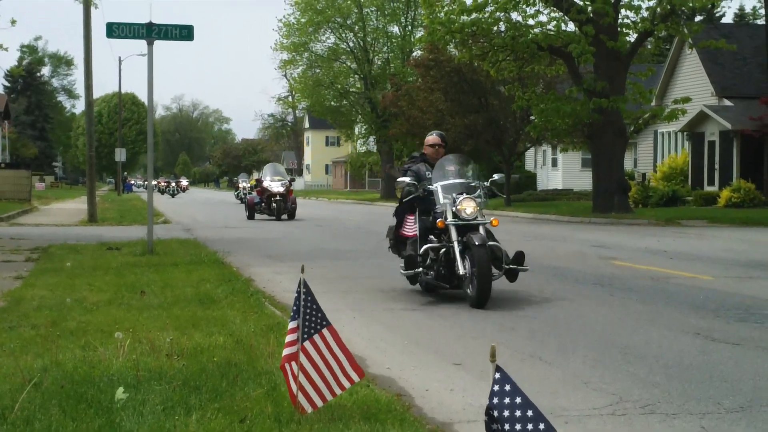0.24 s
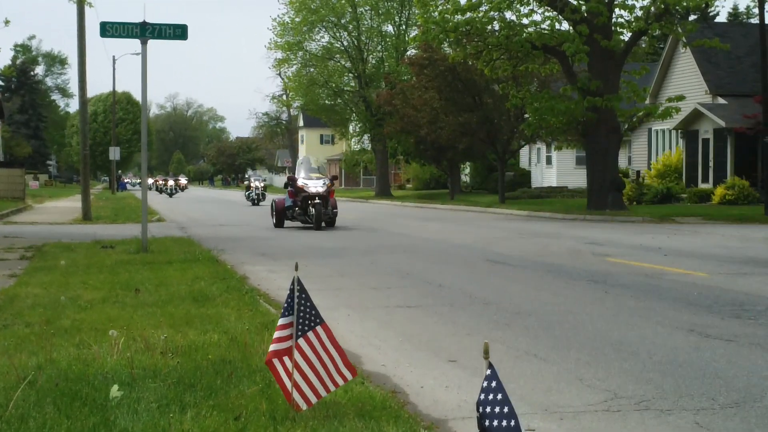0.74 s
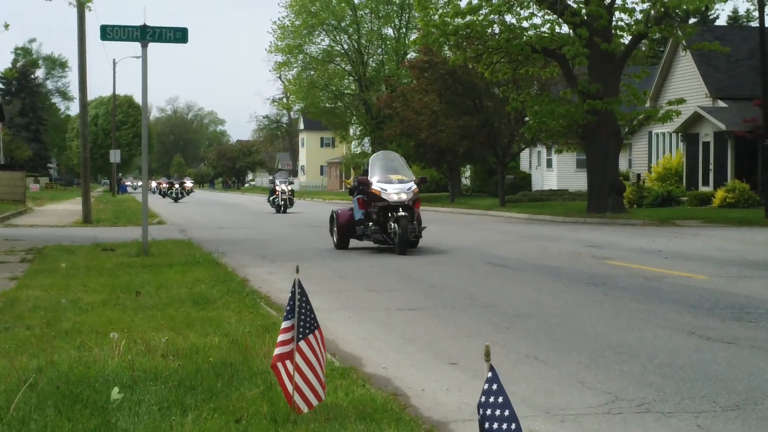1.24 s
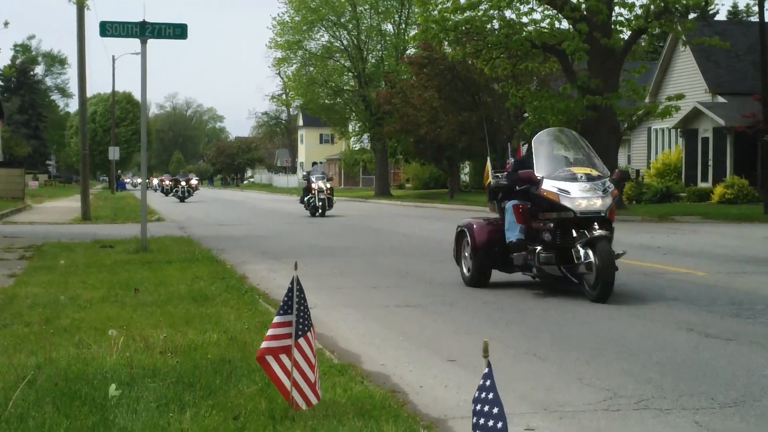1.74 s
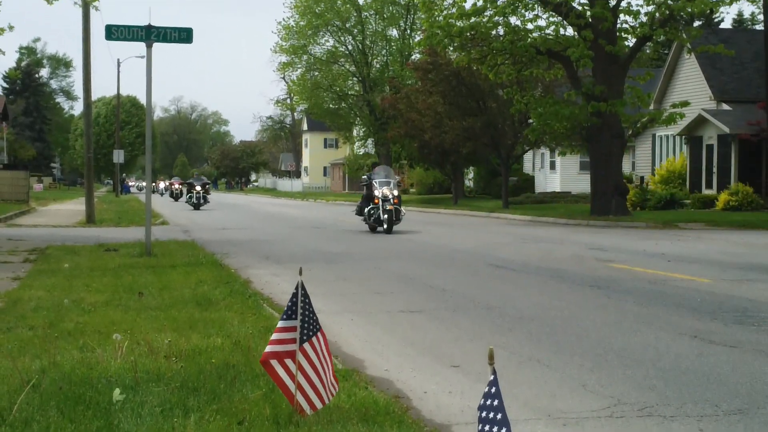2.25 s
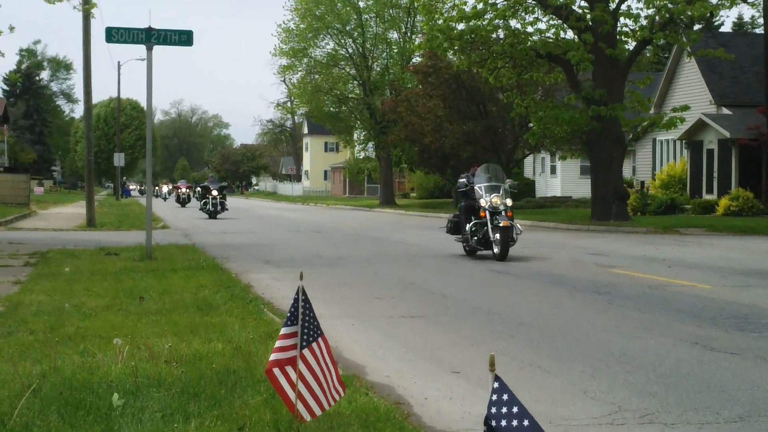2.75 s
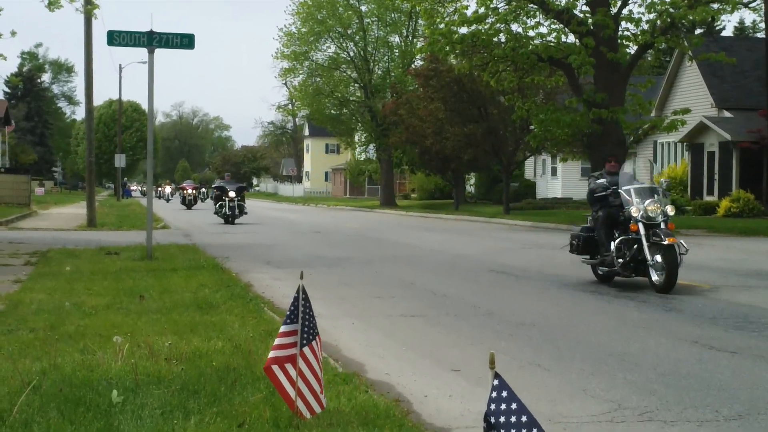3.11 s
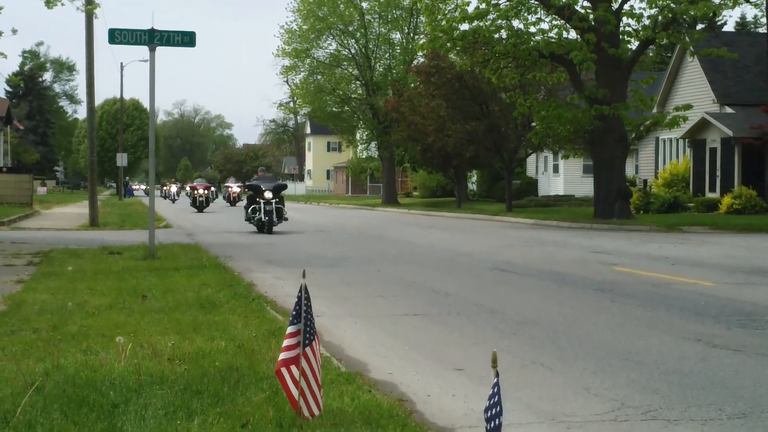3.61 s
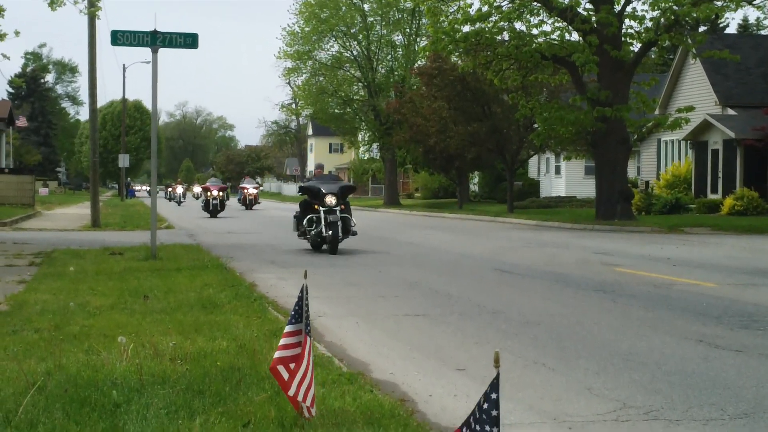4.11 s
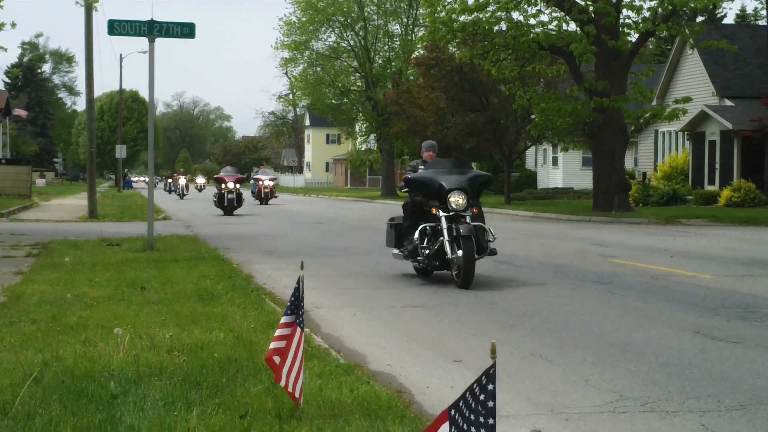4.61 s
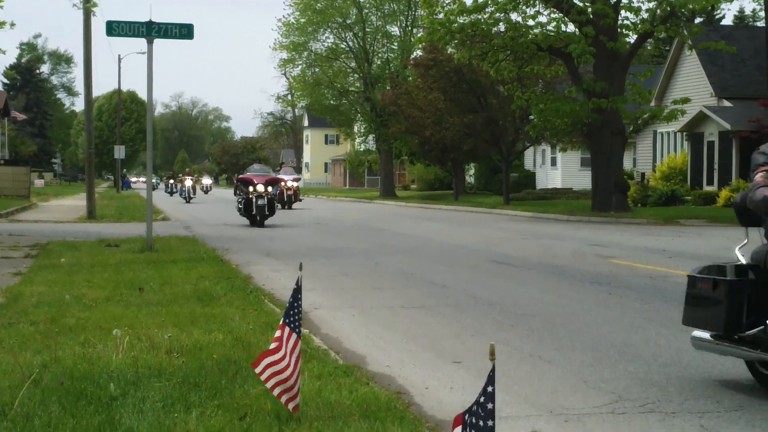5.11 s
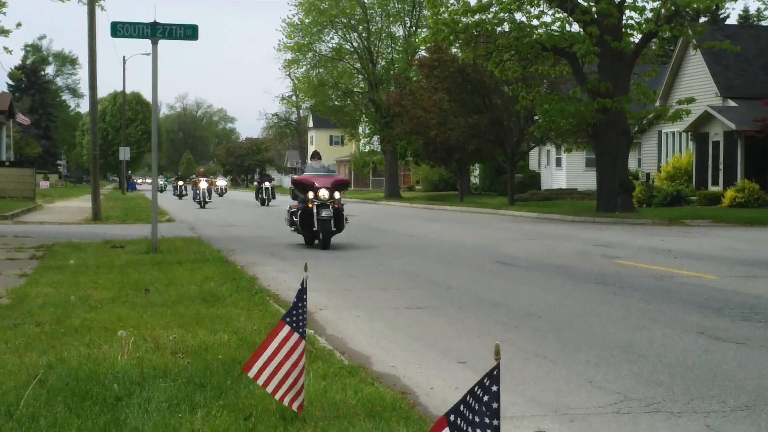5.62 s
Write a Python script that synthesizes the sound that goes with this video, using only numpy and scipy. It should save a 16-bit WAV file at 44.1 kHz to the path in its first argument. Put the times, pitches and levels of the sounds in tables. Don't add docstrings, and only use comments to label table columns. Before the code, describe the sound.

A spaced-out string of heavy low-pitched motorcycles passes close by, engines throbbing and popping, tyres hissing, while gusts buffet the microphone from mid-way.

```python
import sys
import numpy as np
from scipy import signal
from scipy.fft import rfft, irfft
from scipy.io import wavfile

SR = 44100
rng = np.random.default_rng(int(sys.argv[2]) if len(sys.argv) > 2 else 0)


def inscribe(sig):
    pcm = np.round(np.clip(np.atleast_2d(sig).T, -1, 1) * 32767)
    wavfile.write(sys.argv[1], SR, pcm.astype(np.int16))


def boost_factor(decibels):
    exponent = np.asarray(decibels, float) / 20
    return 10 ** exponent


N = 258190

# level_db of each multiple of the engine cycle, from the third up
LEAVING_NOTE = [-16.0, -2.0, 0.0, -7.0, -10.0, -20.0, -12.0, -16.0, -11.0, -13.0, -11.0, -15.0, -15.0,
                -11.0, -12.0, -10.0, -25.0, -22.0, -22.0, -27.0, -26.0, -27.0, -35.0, -25.0, -30.0, -30.0]
CRUISER_NOTE = [-15.0, -18.0, -6.0, -6.0, -7.0, -16.0, -9.0, -10.0, -16.0, -2.0, -4.0, -17.0, -12.0, -6.0,
                -5.0, -5.0, -10.0, -20.0, -20.0, -20.0, -20.0, -27.0, -26.0, -15.0, -22.0, -19.0, -22.0,
                -28.0, -25.0, -22.0, -24.0, -21.0, -22.0, -20.0, -23.0, -21.0, -21.0, -24.0]
TRIKE_NOTE = [-20.0, -20.0, -20.0, -30.0, -16.0, -20.0, -14.0, -21.0, -20.0, -18.0, -25.0, -31.0, -12.0,
              -36.0, -29.0, -22.0, -19.0, -23.0, -14.5, -25.0, -17.5, -26.0, -28.0, -30.0, -26.0, -29.0,
              -36.0, -32.0, -30.0, -32.0, -33.0, -30.0, -33.0]
FAR_LANE_NOTE = [-7.0, -9.0, 0.0, -3.0, -11.0, -13.0, -9.0, -11.0, -14.0, -13.0, -23.0, -13.0, -18.0, -23.0,
                 -17.0, -18.0, -20.0, -24.0, -28.0, -34.0, -36.0, -26.0, -31.0, -29.0, -32.0, -36.0, -28.0]
TOURER_NOTE = [-8.0, -7.0, -2.5, -10.0, -16.0, -8.0, -20.0, -13.0, -12.0, -14.0, -24.0, -24.0, -16.0, -16.0,
               -26.0, -20.0, -27.0, -22.0, -25.0, -28.0, -24.0, -34.0, -37.0, -38.0, -33.0, -32.0]
# half_fallen_s (pitch), fall_s, coming_cycles_per_s, going_cycles_per_s, one_firing_s
PASSES = [
    (.51, .38, 21.2, 19.6, .1),
    (1.01, .2, 14.55, 13.205, 1.4397),
    (2.57, .25, 19.27, 17.81, 2.1),
    (3.872, .42, 21.22, 18.426, 4.4125),
    (5.54, .36, 21.15, 19.1, 5.3),
]
# from_s, to_s
EARSHOT = [
    (0, 1.35),
    (0, 1.95),
    (1.1, 3.2),
    (3.4, 5.2),
    (4.6, 5.86),
]
# loudest_s, level_db, approach_s, retreat_s, left_minus_right_db once past
EXHAUSTS = [
    (.3, -44, 0.88, 0.17, -24),
    (.9, -40.5, 0.17, 0.072, -11.5),
    (2.5, -47, 0.44, 0.11, -18.5),
    (4.0, -37.5, 0.17, 0.18, -11),
    (5.42, -38, 0.23, 0.11, -23),
]
# time_s, peak_db, centre_hz, sizzle_db
CRUISER_CRACKS = [(1.162, -65, 8100, -63), (1.236, -60, 4770, -56), (1.31, -63.0, 5600, -75),
                  (1.44, -56, 5460, -83.0), (1.516, -57, 6700, -82), (1.623, -66, 5600, -84.0),
                  (1.667, -58, 8200, -68), (1.698, -60, 6600, -82.0), (1.819, -96, 5000, -81),
                  (1.85, -59, 7700, -85), (1.895, -62, 4760, -61), (1.927, -60, 6100, -77.0),
                  (1.972, -69, 5300, -77.0), (2.079, -65.0, 7500, -81), (2.123, -70, 5000, -68.0),
                  (2.142, -56, 6370, -61), (2.609, -57, 7250, -83.0), (2.653, -54, 6600, -63),
                  (2.683, -59, 5900, -58), (2.712, -56, 7200, -79), (2.728, -62, 6700, -60),
                  (2.76, -55, 8000, -62.0), (2.804, -57, 7940, -53), (2.815, -69.0, 7740, -65),
                  (2.835, -46.5, 8260, -65), (2.879, -55, 7800, -53), (2.91, -57, 6200, -69),
                  (2.954, -58, 5500, -70), (3.003, -58, 5170, -64), (3.105, -67, 6300, -61),
                  (3.18, -67, 5100, -60), (3.286, -58, 7300, -77.0), (3.33, -56, 7770, -55),
                  (3.35, -53, 4370, -68.0), (3.405, -63, 4600, -58)]
FAR_LANE_CRACKS = [(3.691, -57, 2870, -66.0), (3.821, -60.0, 5000, -61.0), (3.877, -54, 6100, -44),
                   (3.94, -42.5, 4000, -46), (3.963, -45, 3400, -55), (3.991, -44, 4800, -57.0),
                   (4.043, -49, 4300, -42), (4.095, -51, 3740, -43), (4.17, -48, 3040, -40),
                   (4.181, -55, 3370, -43), (4.224, -45, 3080, -42), (4.239, -60, 5700, -44),
                   (4.254, -64.0, 4700, -56), (4.276, -45.5, 3320, -46), (4.292, -61.0, 3700, -43),
                   (4.33, -63.0, 3800, -49), (4.344, -63.0, 4600, -52), (4.36, -51, 4100, -50),
                   (4.383, -48.5, 3800, -51), (4.414, -51, 5500, -46), (4.436, -47, 4040, -58),
                   (4.467, -47.5, 4300, -45), (4.49, -53, 3870, -61), (4.521, -53, 5330, -49),
                   (4.543, -61.0, 4000, -60), (4.56, -60, 5630, -62), (4.576, -56, 5300, -53),
                   (4.597, -63.0, 4900, -59), (4.628, -48, 5160, -51), (4.65, -52, 4600, -63),
                   (4.683, -60, 5600, -68.0), (4.736, -54, 6230, -59), (4.759, -50, 6500, -56),
                   (4.844, -55.0, 4600, -62), (5.116, -62, 6500, -62), (5.198, -59, 4750, -54),
                   (5.222, -57, 6500, -60), (5.276, -54, 4600, -60), (5.336, -57, 5000, -58)]
# time_s, peak_db, centre_hz, sizzle_db
KNOCKS = [(0.575, -48, 738, -80), (0.643, -46, 525, -80), (0.712, -43, 522, -82), (3.244, -49, 751, -101),
          (3.689, -45, 500, -87), (3.787, -62, 501, -80), (3.887, -50, 501, -80), (3.937, -49, 503, -80),
          (3.989, -54, 720, -80), (4.064, -51, 507, -80), (4.093, -45.5, 700, -84), (4.198, -58, 720, -80),
          (4.412, -47, 540, -84), (4.465, -52, 501, -78), (4.519, -50, 550, -82), (4.681, -68, 643, -80)]
# time_s, level_db
FIRING_TONE = [(1.2, -74), (1.45, -50.5), (1.7, -51), (1.95, -47), (2.3, -42.5), (2.55, -42.5), (2.76, -48),
               (2.84, -65), (3.2, -59)]
# time_s, level_db
GEAR_MESH = [(1.65, -85), (1.8, -72), (2.1, -69.5), (2.4, -61), (2.47, -61), (2.55, -88)]
# nearest_s, low_db, middle_db, top_db, retreat_s
ROAD = [
    (3.4, -72, -83, -82, 0.023),
    (.4, -64, -70, -80.5, 0.48),
    (.92, -63.5, -72, -74, 0.19),
    (2.27, -64.5, -77.5, -85, 0.78),
    (3.83, -67, -72.5, -80, 0.74),
    (5.4, -63, -67, -73, 0.3),
]
# approach_s, late_s (of the peak), steepness (with distance), far_column_db
HISS_RANGES = [
    (0.2, 0.0026, 1.53, -72),
    (0.43, 0.029, 1.51, -91.5),
    (0.47, 0.021, 2.4, -95),
]
# late_s (after nearest), lasting (share of retreat),
# inverted (share)
REAR_LOBE = [
    (.1, 0.91, 0.31),
    (.12, 0.54, 0.46),
    (.4, 0.69, 0.48),
]
# pitch_hz, level_db (per Hz)
ROAD_COLOUR = [(260, -8), (450, 5.5), (570, 3.5), (662, 4.5), (745, 6), (944, 2), (1100, 3.5), (2590, -5),
               (9830, -9.5), (15600, -21.5)]
# pitch_hz, level_db (per Hz)
ROAR_COLOUR = [(29, -20), (50, -10), (92, -1), (122, -0.5), (194, -18.5), (238, -9), (338, -20),
               (555, -29.5), (900, -42.5), (1170, -79), (1980, -120)]
# pitch_hz, likeness (0 to 1)
LIKENESS = [(100, .1), (400, .3), (1500, .65), (5000, .7), (7200, .85), (9200, .88), (12000, .7),
            (15500, .65)]
# pitch_hz, lead_radians
PORT_PHASE = [(0, 0), (3010, 0.1), (6290, 0.1), (8180, -0.1), (9130, -0.2), (12500, -1.7), (13400, -1.6),
              (15200, -2.7)]
# start_s, end_s, pitch_hz, width_hz, level_db
WHINES = [(1.15, 1.5, 1250, 70, -76), (1.75, 2.45, 1240, 130, -68), (1.5, 2.65, 1700, 1100, -69.5),
          (-.4, .45, 1150, 160, -70), (-.4, .3, 2000, 1400, -70), (3.9, 4.45, 9700, 2800, -72.5),
          (4.25, 4.95, 12300, 2600, -80), (4.15, 4.65, 3700, 1400, -73), (5.1, 5.6, 2000, 1000, -70),
          (4.94, 5.07, 7880, 90, -78), (4.95, 5.05, 8170, 90, -81), (5.33, 5.4, 7700, 60, -78)]
# pass_index, from_s, to_s, level_db
REAR_TICKS = [
    (1, 1.6, 2.2, -54),
    (1, 2.55, 3.95, -49),
    (3, 4.4, 5.45, -47),
]
# time_s, thump_db, left_minus_right_db, flutter_minus_thump_db
GUSTS = [(0, -60, 14, -11), (.6, -71, 13, 4), (1.05, -47.5, -9, -2.5), (1.3, -66, 3.5, 11),
         (1.5, -71, 3, -8), (1.85, -77, 11, 4), (2.2, -51, -4, -12), (2.5, -49, 8, -27),
         (2.8, -50.5, 8.5, -9.5), (3.1, -48.5, -1.5, -0.5), (3.35, -33, -3.5, -12.5), (3.6, -38, 2.5, -1.5),
         (3.9, -28.5, -2, -9), (4.25, -29.5, 4, -6.5), (4.5, -35, -1, -9), (5.0, -33.5, 0, -23),
         (5.45, -45.5, 4, -2.5), (5.85, -45, 5.5, -8.5)]
# pitch_hz, level_db (per Hz)
GUST_COLOUR = [(2.9, -23), (5.0, 5.5), (17, -1.5), (69, -17), (102, -16), (272, -29), (534, -47),
               (693, -55), (900, -67), (1170, -102), (1980, -120)]
# start_s, end_s, pitch_hz, level_db, port (0 left, 1 right)
HUMS = [(3.27, 3.45, 165, -38, 1), (3.14, 3.3, 82, -53, 0), (3.48, 3.62, 175, -44, 0),
        (4.2, 4.35, 135, -36, 0)]
# time_s, width_s
LULLS = [(3.48, .012), (3.975, .008), (4.235, .01), (4.452, .014), (4.535, .01), (4.79, .014), (4.857, .01)]
# time_s, peak_db, width_ms, port (0 left, 1 right), push (1, pull -1)
SLAPS = [(3.225, -27, 6.4, 0, -1), (3.555, -22, 2.9, 0, 1), (3.603, -29.5, 4.4, 1, -1),
         (3.603, -27, 4.9, 0, 1), (3.637, -27, 1.85, 1, 1), (3.66, -24, 2.4, 0, -1),
         (3.669, -18.5, 10.2, 1, 1), (3.723, -21, 4.1, 0, -1), (3.733, -21, 7, 1, -1),
         (3.785, -30, 6.1, 0, -1), (3.887, -21, 6.0, 1, 1), (3.918, -27, 3.4, 0, -1),
         (3.918, -14.5, 4.3, 1, 1), (3.966, -26, 3.2, 1, 1), (4.029, -31, 2.7, 1, 1),
         (4.098, -19, 4.2, 1, -1), (4.099, -24, 3.3, 0, 1), (4.141, -22, 3.5, 0, 1),
         (4.158, -22, 7.4, 1, 1), (4.202, -13.5, 4.3, 1, -1), (4.254, -21.5, 5.2, 1, -1),
         (4.263, -27, 2.6, 0, 1), (4.299, -31, 3.9, 0, 1), (4.433, -19.5, 5.7, 1, 1),
         (4.477, -25, 3.6, 0, 1), (4.504, -26, 3, 0, 1), (4.523, -31, 4.8, 1, -1), (4.558, -23, 3.3, 1, -1),
         (4.679, -21.5, 7, 1, 1), (4.837, -26.5, 8, 1, -1), (4.874, -18, 2.9, 1, 1),
         (4.884, -24, 3.1, 0, 1), (5.077, -24.5, 4.3, 1, 1), (5.3, -23, 5.9, 1, -1),
         (5.333, -23, 5.9, 0, 1), (5.577, -22.5, 3, 1, 1), (5.581, -23, 5.3, 0, -1),
         (5.606, -22, 1.7, 1, -1), (5.665, -20.5, 6.7, 1, -1), (5.708, -30, 4.4, 1, -1)]

COMING_PAN_DB = -2
PUFF_RISE_S = .0006
SWEEP_CYCLES, SWEEP_LATE_CYCLES = .07, .25
SWEEP_SCATTER = .35
SHOCK = 1.7
HISS_PAN_DB, SWING_DB, SWING_LATE_S, SWING_S = -2.5, -6.5, 0.12, 0.2
SHEEN_NEAR_HZ, SHEEN_FAR_HZ = 10400, 13100
SHEEN_WIDTH, SHEEN = 1.207, 0.9
LOBE_EDGE_S, LOBE_LEAST_S, LOBE_TOP_HZ = 0.065, 0.23, 11000
BOUNCE_FAR_MS, BOUNCE_NEAR_MS = 0.18, 0.25
BOUNCE_LATE_S, BOUNCE_S = 0.17, 0.16
REAR_TICK_HZ, REAR_TICK_TOP_HZ, REAR_TICK_DB = 7800, 10600, -5
LULL_DEPTH = .85


def engine(half_s, fall_s, coming, going, fire_s):
    passed = (1 + np.tanh((np.arange(N) / SR - half_s) / fall_s)) / 2
    turns = np.cumsum(coming + (going - coming) * passed) / SR
    return passed, turns - turns[round(fire_s * SR)]


def firings(turns, twin_gap, second_db, spread_db):
    first = np.diff(np.floor(turns), prepend=0) > 0
    second = np.diff(np.floor(turns - twin_gap), prepend=0) > 0
    strength = boost_factor(spread_db * np.clip(rng.standard_normal(N), -2, 2))
    return (first + boost_factor(second_db) * second) * strength


def exhaust_tones(note, passed, turns, span, wander_db, dulling, hollow_db, scatter):
    tones = np.zeros((2, N))
    far_db = -dulling * (1 - np.clip(3 * passed, 0, 1))[span]
    thin_db = hollow_db * passed[span] ** 8
    for multiple, db in enumerate(note, start=3):
        beat, sway = drift(2.)[:, span], drift(1.)[:, span]
        sweep = np.pi * multiple * (2 * SWEEP_LATE_CYCLES + SWEEP_CYCLES * multiple)
        start = np.array([[0], [1.3]]) + SWEEP_SCATTER * rng.standard_normal((2, 1))
        start = start + scatter * rng.standard_normal() - sweep
        level_db = db + wander_db * beat + far_db * multiple / 20 + (multiple < 7) * thin_db
        tones[:, span] += boost_factor(level_db) * np.sin(2 * np.pi * multiple * turns[span] + start + .35 * sway)
    return tones / np.sqrt(np.sum(boost_factor(np.array(note[2:])) ** 2) / 2)


def bike(index, note, wander_db, roar_db, pop_db, pop_hz, rasp_db, rear_db, dulling, hollow_db,
         twin_gap=.41, scatter=0):
    start_s, end_s = EARSHOT[index]
    passed, turns = engine(*PASSES[index])
    loudest_s, peak_db, approach_s, retreat_s, past_pan_db = EXHAUSTS[index]
    span = slice(round(start_s * SR), min(N, round(end_s * SR)))
    tones = exhaust_tones(note, passed, turns, span, wander_db, dulling, hollow_db, scatter)
    rear = boost_factor(rear_db * passed ** 2)

    clicks = firings(turns, twin_gap, -3.5, 1.2)
    puff = signal.lfilter([1], [1, -np.exp(-1 / (.004 * SR))], clicks)
    puff = signal.sosfilt(signal.butter(2, 1 / (2 * np.pi * PUFF_RISE_S), fs=SR, output="sos"), puff)
    roar = boost_factor(roar_db) * (0.44 + puff) * coloured(ROAR_COLOUR)

    r, w = np.exp(-np.pi * 250 / SR), 2 * np.pi * pop_hz / SR
    ring = signal.lfilter([0, np.sin(w)], [1, -2 * r * np.cos(w), r * r], clicks)
    pop = boost_factor(pop_db) * rear * ring

    snap = signal.lfilter([1], [1, -np.exp(-1 / (.0015 * SR))], clicks * boost_factor(2 * drift(40, count=1)))
    rasp = boost_factor(rasp_db) * rear * snap * rms_one(band(coloured(ROAD_COLOUR), 3000, 20000))

    t = np.arange(N) / SR
    fade_in = np.clip((t - start_s) / 0.38 + (start_s == 0), 0, 1)
    fade_out = np.clip((end_s - t) / 0.21 + (end_s > N / SR), 0, 1)
    pan_db = (COMING_PAN_DB + past_pan_db * passed) * np.array([[.5], [-.5]])
    level = boost_factor(peak_db + pan_db) * np.sqrt(swell(loudest_s, approach_s, retreat_s))
    turned = np.array([np.tanh(4 - 8 * passed), np.ones(N)])
    return fade_in * fade_out * level * (tones + (roar + pop + rasp) * turned)


def drone(curve, order, pan_swing_db):
    (level_db,) = in_time(curve)
    t = np.arange(N) / SR
    passed, turns = engine(*PASSES[2])
    heard = np.clip((t - curve[0][0]) * 10, 0, 1) * np.clip((curve[-1][0] - t) * 10, 0, 1)
    phase = 2 * np.pi * order * turns + np.array([[0], [1.3]])
    pan_db = (COMING_PAN_DB + pan_swing_db * passed) * np.array([[.5], [-.5]])
    return heard * boost_factor(level_db + 3.0 + 1.8 * drift(9.9) + pan_db) * np.sin(phase)


def cracks(events, decay_s, width, sizzle_hz, sizzle_db, left, gain_db):
    out, age = np.zeros((2, N)), np.arange(300) / SR
    for s, db, hz, top_db in events:
        common, *own = rng.standard_normal((3, 300))
        common[:3] = SHOCK
        burst = (common + .3 * np.array(own)) * np.exp(-age / decay_s)
        body = band(band(burst, hz / width, hz * width), hz / width, hz * width)
        sizzle = band(band(burst, sizzle_hz, 12500), sizzle_hz, 13500)
        sizzle = sizzle * [[-1], [1]]
        at = round(s * SR)
        out[:, at:at + 300] += boost_factor(db + gain_db) * body / np.abs(body).max()
        out[:, at:at + 300] += boost_factor(top_db + sizzle_db) * sizzle / np.abs(sizzle).max()
    return out * [[left], [1]]


def road():
    pan_db = HISS_PAN_DB + SWING_DB * nearness(SWING_LATE_S, SWING_S)
    hiss, shared = coloured(ROAD_COLOUR), drift(40.0, count=1)
    low, below_top = [signal.sosfiltfilt(signal.butter(2, hz, fs=SR, output="sos"), hiss)
                      for hz in (2500, 7000)]
    top, near = hiss - below_top, nearness(BOUNCE_LATE_S, BOUNCE_S)
    for hz, share in ((SHEEN_NEAR_HZ, near), (SHEEN_FAR_HZ, 1 - near)):
        top = top + SHEEN * share * band(top, hz / SHEEN_WIDTH, hz * SHEEN_WIDTH)
    ranges = [(low, 1.1), (below_top - low, .9), (top, .5)]
    out = 0
    for k, (part, swing) in enumerate(ranges):
        approach_s, late_s, steep, far_db = HISS_RANGES[k]
        power = boost_factor(far_db) ** 2
        for s, *dbs, retreat_s in ROAD:
            power = power + boost_factor(dbs[k]) ** 2 * swell(s + late_s, approach_s, retreat_s) ** steep
        lobe_late_s, lasting, inverted = REAR_LOBE[k]
        part = rms_one(part)
        lobed = signal.sosfiltfilt(signal.butter(4, LOBE_TOP_HZ, fs=SR, output="sos"), part[1])
        part = np.array([part[0] - 2 * inverted * behind(lobe_late_s, lasting) * lobed, part[1]])
        patches_db = .5 * shared + .5 * drift(47, count=1)
        sides_db = swing * np.array([pan_db, -pan_db]) / 2
        out = out + part * np.sqrt(power) * boost_factor(patches_db + sides_db)
    return out


def bounce(x, share):
    near = nearness(BOUNCE_LATE_S, BOUNCE_S)
    lag = (BOUNCE_FAR_MS + (BOUNCE_NEAR_MS - BOUNCE_FAR_MS) * near) * SR / 1000
    bright = x - signal.sosfilt(signal.butter(2, 700, fs=SR, output="sos"), x)
    late = [np.interp(np.arange(N) - lag, np.arange(N), side) for side in bright]
    return x + share * np.array(late)


def swell(peak_s, approach_s, retreat_s):
    late = np.arange(N) / SR - peak_s
    return 1 / (1 + (late / np.where(late < 0, abs(approach_s), abs(retreat_s))) ** 2)


def nearness(late_s, width_s):
    return np.max([swell(row[0] + late_s, width_s, width_s * (0.86 + 0.46 * row[-1]))
                   for row in ROAD[2:]], axis=0)


def behind(late_s, lasting):
    t, stays = np.arange(N) / SR, []
    for s, *_, retreat_s in ROAD[2:]:
        age = t - s - late_s
        enters = np.tanh(age / LOBE_EDGE_S)
        leaves = np.tanh((age - LOBE_LEAST_S - lasting * retreat_s) / LOBE_EDGE_S)
        stays.append((enters - leaves) / 2)
    return np.max(stays, axis=0)


def whines():
    out, t = 0, np.arange(N) / SR
    for start, end, hz, width_hz, db in WHINES:
        tone = rms_one(band(rng.standard_normal(N), hz - width_hz / 2, hz + width_hz / 2))
        rough_db = 3.0 * (width_hz > 1200) * drift(35, count=1)[0]
        rise_fall = np.sin(np.pi * np.clip((t - start) / (end - start), 0, 1)) ** .5
        out = out + boost_factor(db + rough_db) * tone * rise_fall
    return out * boost_factor(np.array([[-1.5], [1.5]]))


def rear_ticks():
    out, t = 0, np.arange(N) / SR
    for index, start, end, db in REAR_TICKS:
        turns = engine(*PASSES[index])[1]
        clicks = firings(turns, .416, -2, 3.5) * (t > start) * (t < end)
        puffs = signal.lfilter([1], [1, -np.exp(-1 / (.002 * SR))], clicks + 1e-18)
        puffs = puffs * rng.standard_normal(N)
        main = band(puffs, REAR_TICK_HZ / 1.08, REAR_TICK_HZ)
        upper = band(puffs, REAR_TICK_TOP_HZ / 1.2, REAR_TICK_TOP_HZ * 1.03)
        out = out + boost_factor(db + REAR_TICK_DB) * (main + .5 * upper)
    return out * np.array([[-1], [1]])


def far_traffic():
    return boost_factor(-53.0 + 2 * drift(1.0)) * coloured(ROAR_COLOUR)


def wind():
    hz, t = np.arange(N // 2 + 1) * SR / N, np.arange(N) / SR
    noise = irfft(rfft(rng.standard_normal((2, N))) * boost_factor(at_hz(GUST_COLOUR, hz)), N)
    thump = signal.sosfilt(signal.butter(3, 60, fs=SR, output="sos"), noise)
    flutter = signal.sosfilt(signal.butter(3, 60, "high", fs=SR, output="sos"), noise)
    thump_db, pan_db, flutter_db = in_time(GUSTS)
    ports_db = thump_db + 3.5 + np.array([pan_db, -pan_db]) / 2 + 1.44 * drift(1.0)
    out = rms_one(thump) * boost_factor(ports_db + 2.5 * drift(6.2))
    out = out + rms_one(flutter) * boost_factor(ports_db + flutter_db + 1.87 * drift(15.0))
    for s, width_s in LULLS:
        out = out * (1 - LULL_DEPTH * np.exp(-((t - s) / width_s) ** 2 / 2))
    for start, end, hum_hz, db, port in HUMS:
        rise_fall = np.sin(np.pi * np.clip((t - start) / (end - start), 0, 1))
        cycles = hum_hz * (t - start) * (1.05 - 0.476 * (t - start))
        out[int(port)] += boost_factor(db + 5.5) * rise_fall * np.sin(2 * np.pi * cycles)
    return out


def slaps(gain_db):
    out, t = np.zeros((2, N)), np.arange(-1500, 1500) / SR
    for s, db, width_ms, port, way in SLAPS:
        u, at = (t / (width_ms * .0008)) ** 2, round(s * SR)
        push = np.sign(way) * boost_factor(db + gain_db) * (1 - u) * np.exp(-u / 2)
        out[int(round(port)), at - 1500:at + 1500] += push
    return out


def rms_one(x):
    return x / np.sqrt(np.mean(x ** 2, axis=-1, keepdims=True) + 1e-20)


def in_time(rows):
    s, *columns = np.transpose(rows)
    return [np.interp(np.arange(N) / SR, s, c) for c in columns]


def at_hz(points, hz):
    point_hz, value = np.array(points)[:, 0], np.array(points)[:, 1]
    return np.interp(np.log(hz + 1), np.log(point_hz + 1), value)


def drift(rate, count=2):
    r = np.exp(-80 * np.pi * rate / SR)
    draws = rng.standard_normal((count, N // 40 + 2002))
    slow = signal.lfilter([1], [1, -2 * r, r * r], draws)[:, 2000:]
    return np.array([np.interp(np.arange(N) / 40, np.arange(len(row)), row) for row in rms_one(slow)])


def coloured(spectrum):
    hz = np.arange(N // 2 + 1) * SR / N
    mid, side = rfft(rng.standard_normal((2, N)))
    alike = np.clip(at_hz(LIKENESS, hz), -1, 1)
    left = (np.sqrt(1 + alike) * mid + np.sqrt(1 - alike) * side) * np.exp(1j * at_hz(PORT_PHASE, hz))
    right = np.sqrt(1 + alike) * mid - np.sqrt(1 - alike) * side
    pair = irfft(np.array([left, right]) * boost_factor(at_hz(spectrum, hz)), N)
    return pair / np.sqrt(np.mean(pair ** 2))


def band(x, low_hz, high_hz):
    return signal.sosfilt(signal.butter(2, [low_hz, min(high_hz, .45 * SR)], "band", fs=SR, output="sos"), x)


def scene():
    leaving = bike(index=0, note=LEAVING_NOTE, wander_db=1.0, roar_db=-9, pop_db=-8, pop_hz=610,
                   rasp_db=-23, rear_db=10, dulling=.5, hollow_db=-34, scatter=2.5)
    cruiser = bike(index=1, note=CRUISER_NOTE, wander_db=2, roar_db=-7, pop_db=-2, pop_hz=540,
                   rasp_db=-21, rear_db=-4, dulling=.1, hollow_db=0)
    trike = bike(index=2, note=TRIKE_NOTE, wander_db=1.8, roar_db=-2, pop_db=-40, pop_hz=500,
                 rasp_db=-60, rear_db=1, dulling=9.0, hollow_db=-3, scatter=1.5)
    far_lane = bike(index=3, note=FAR_LANE_NOTE, wander_db=-1.5, roar_db=-11.5, pop_db=-0.5, pop_hz=700,
                    rasp_db=-21, rear_db=4, dulling=1.3, hollow_db=0)
    tourer = bike(index=4, note=TOURER_NOTE, wander_db=2, roar_db=-9, pop_db=-26, pop_hz=900,
                  rasp_db=-43.0, rear_db=3, dulling=6.5, hollow_db=-1, scatter=1.4)
    bikes = leaving + cruiser + trike + far_lane + tourer
    bikes = bikes + drone(FIRING_TONE, order=6, pan_swing_db=-14.0)
    bikes = bikes + drone(GEAR_MESH, order=29, pan_swing_db=-8.0)
    bikes = bikes + cracks(CRUISER_CRACKS, decay_s=.0012, width=1.35, sizzle_hz=9000, sizzle_db=1.5,
                           left=-.1, gain_db=6)
    bikes = bikes + cracks(FAR_LANE_CRACKS, decay_s=.0015, width=1.28, sizzle_hz=7500, sizzle_db=-5,
                           left=-.2, gain_db=3)
    bikes = bikes + cracks(KNOCKS, decay_s=0.0037, width=2.68, sizzle_hz=1200, sizzle_db=24,
                           left=0.3, gain_db=2.5)
    lane = bounce(bikes + boost_factor(4.0) * road(), share=0.087)
    return lane + whines() + rear_ticks() + far_traffic() + wind() + slaps(gain_db=-1.0)


def roll_off(x):
    return signal.sosfilt(signal.butter(12, 15710, fs=SR, output="sos"), x)


def record(dry):
    return roll_off(dry)


dry = scene()
out = record(dry)
inscribe(out)
```